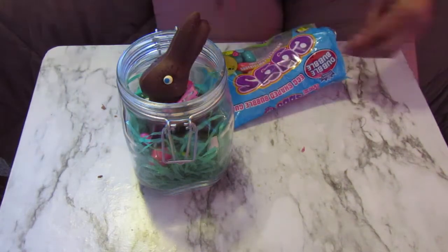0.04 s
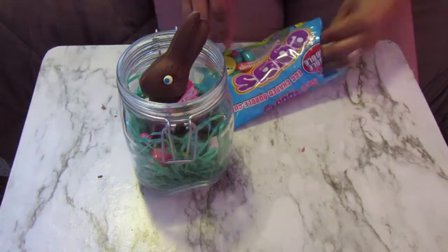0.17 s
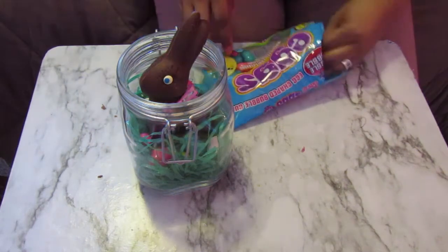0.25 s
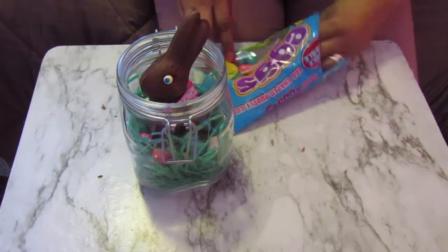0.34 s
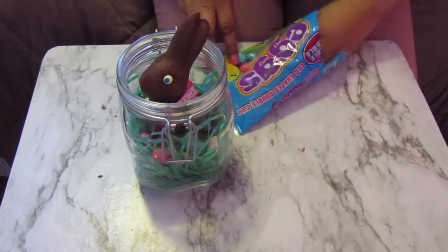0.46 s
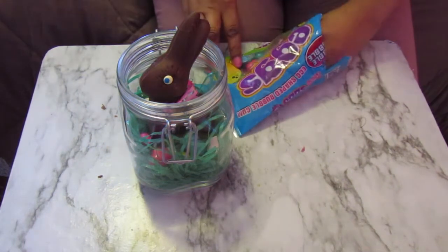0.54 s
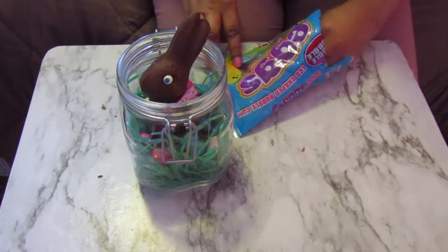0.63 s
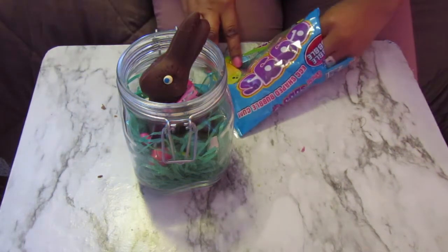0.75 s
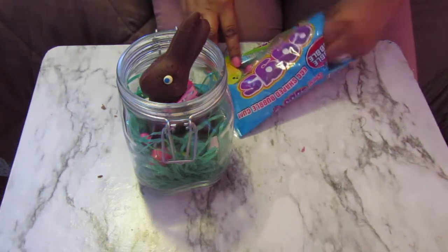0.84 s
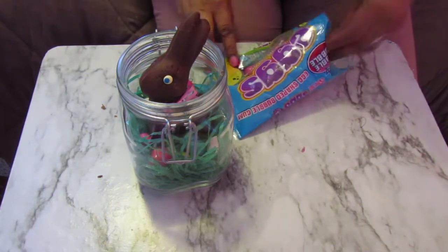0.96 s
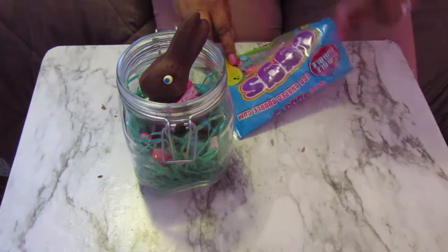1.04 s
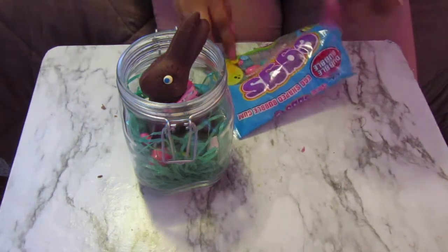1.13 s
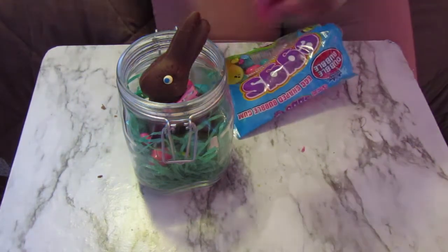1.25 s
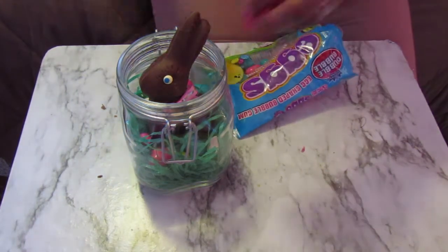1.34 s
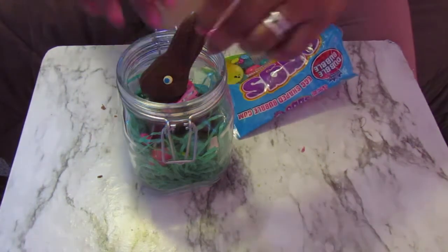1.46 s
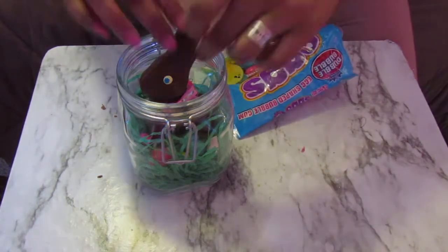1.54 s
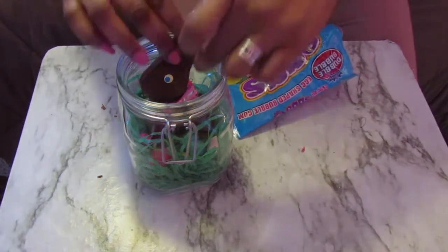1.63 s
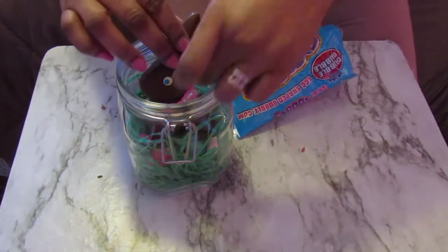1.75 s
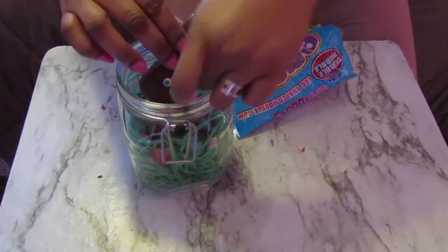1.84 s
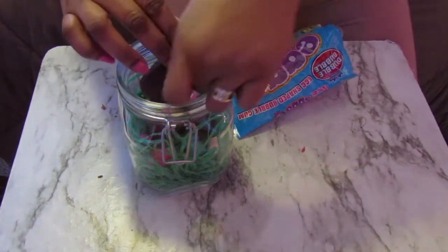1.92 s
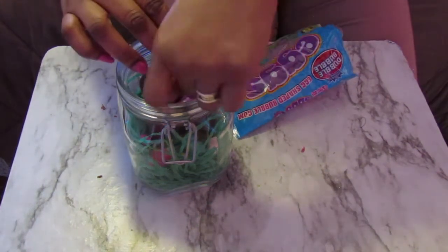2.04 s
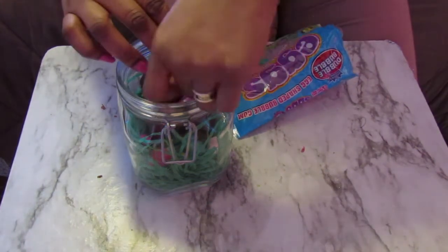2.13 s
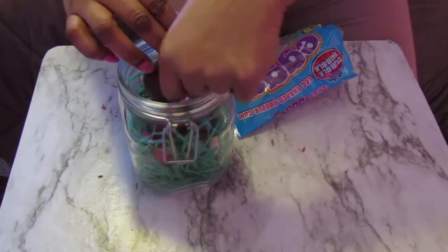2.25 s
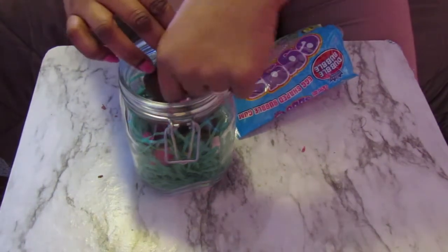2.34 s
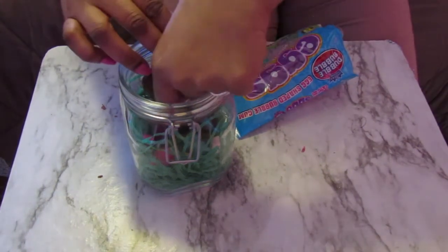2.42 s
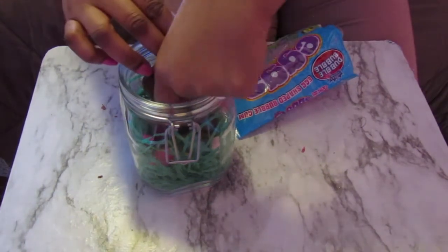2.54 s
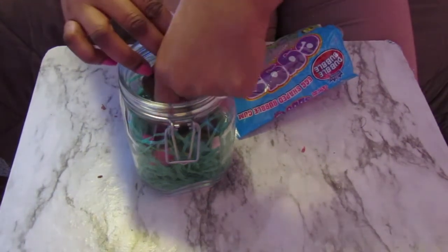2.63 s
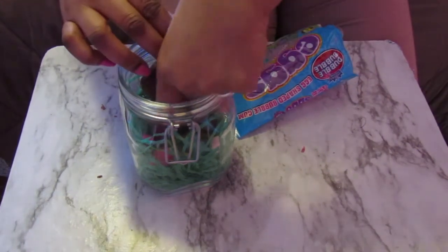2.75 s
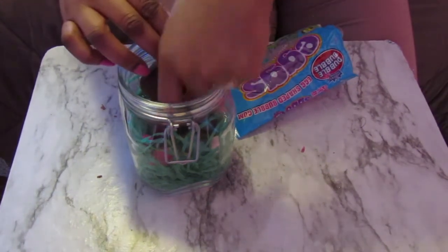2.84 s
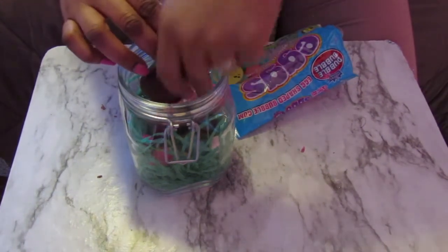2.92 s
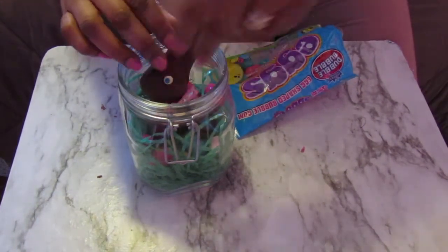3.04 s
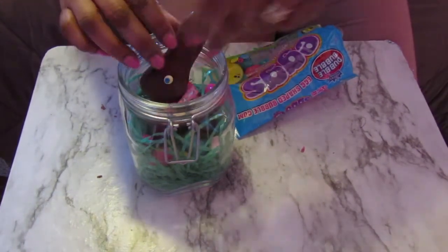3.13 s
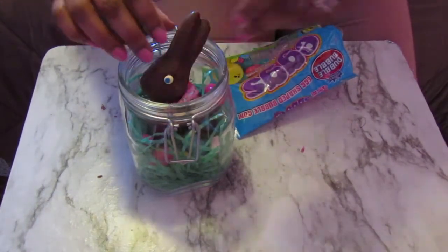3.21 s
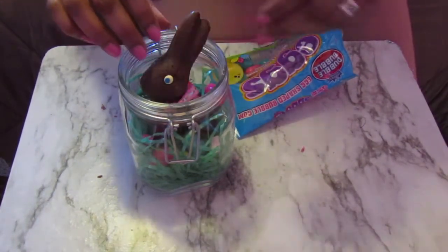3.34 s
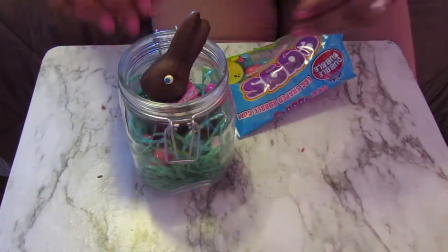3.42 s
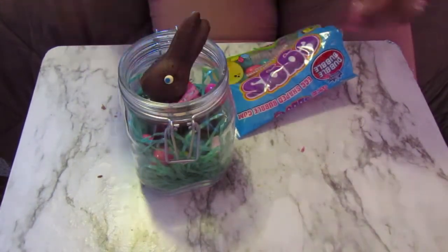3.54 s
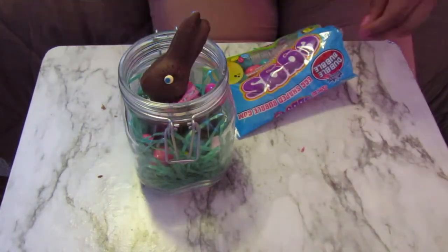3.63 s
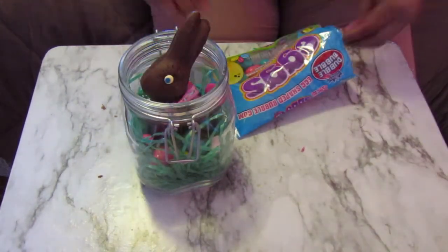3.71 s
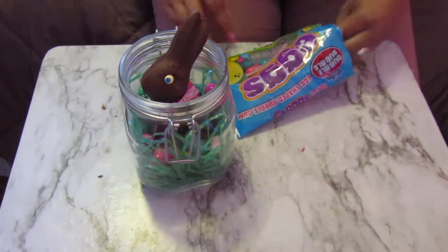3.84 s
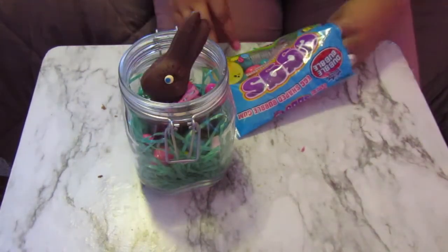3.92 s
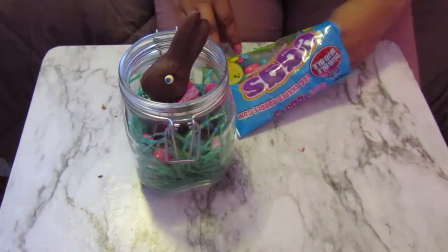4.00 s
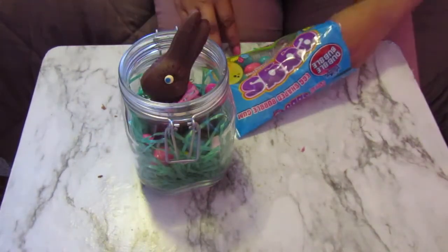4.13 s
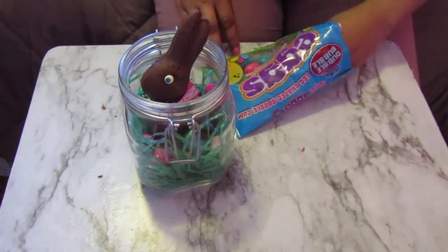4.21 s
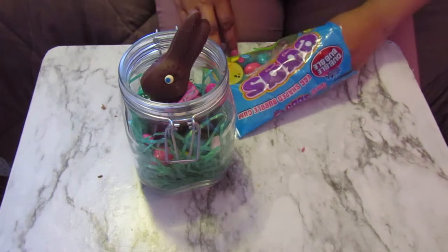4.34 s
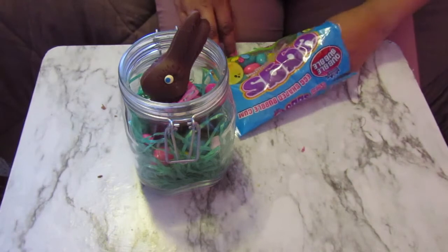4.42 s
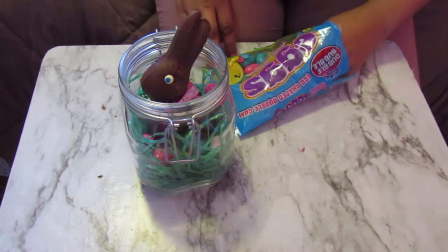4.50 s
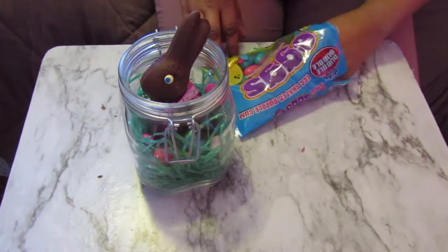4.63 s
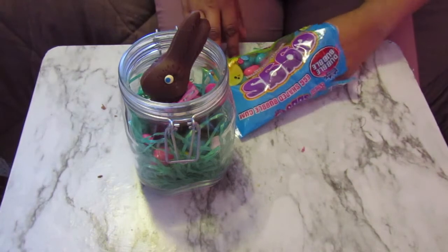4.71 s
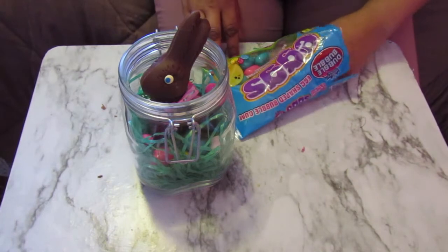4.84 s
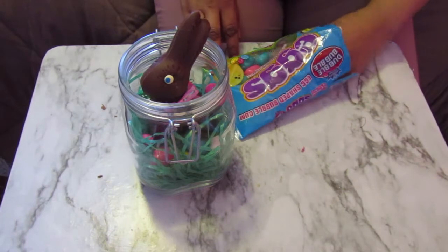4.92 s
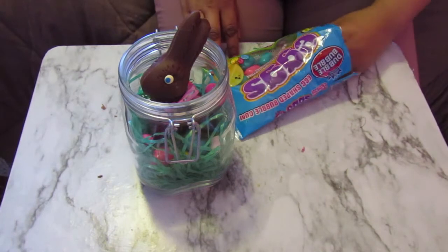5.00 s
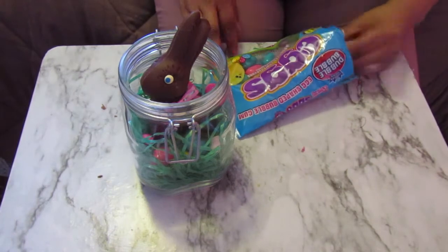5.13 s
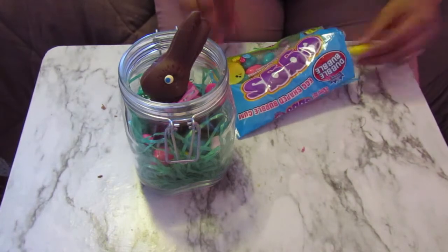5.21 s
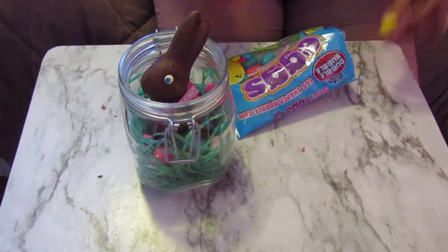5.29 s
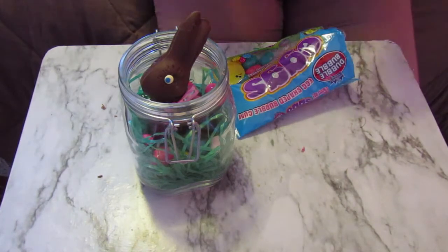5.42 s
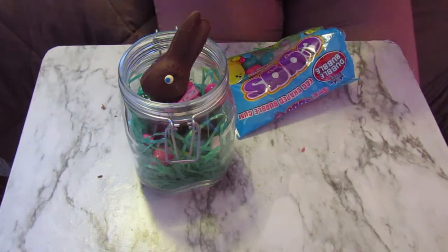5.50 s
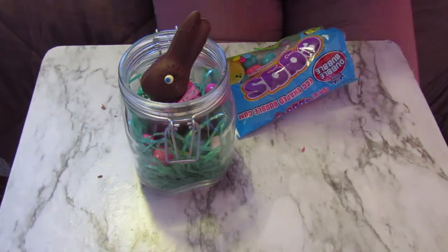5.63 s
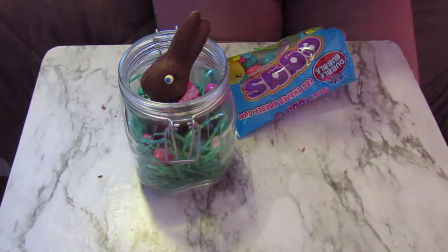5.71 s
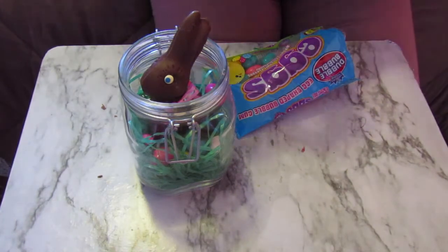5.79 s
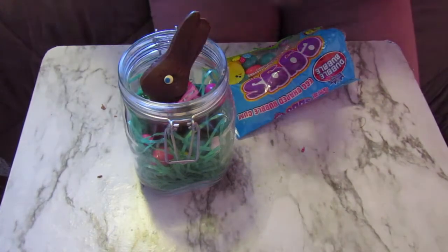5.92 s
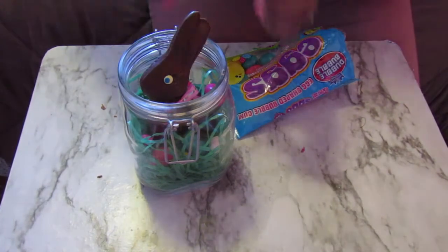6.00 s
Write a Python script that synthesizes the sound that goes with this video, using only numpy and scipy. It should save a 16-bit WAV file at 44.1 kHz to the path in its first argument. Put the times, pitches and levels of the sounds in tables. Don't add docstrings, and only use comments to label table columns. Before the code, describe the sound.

In a small soft-furnished room, a hand digs through stiff candy wrapping on a thin table: sharp pops over fine crackle. Hard gum eggs then tap a glass jar, first lightly in a double tick, then loudly and ringing. A lone film snap and table knock precede a second burst of rummaging. Faint appliance hum, hiss and tiny paired mechanical ticks lie behind.

```python
import sys
import numpy as np
from scipy import signal
from scipy.fft import rfft, irfft
from scipy.io import wavfile

SR = 44100
rng = np.random.default_rng(int(sys.argv[2]) if len(sys.argv) > 2 else 0)


def amplitude_ratio(level_db):
    exponent = np.asarray(level_db, float) / 20
    return 10 ** exponent


def materialize(psi):
    bounded = np.clip(np.atleast_2d(psi).T, -1, 1)
    quanta = np.round(bounded * 32767).astype(np.int16)
    wavfile.write(sys.argv[1], SR, quanta)


N = 267246

# low_hz, high_hz
FILM_BANDS = [(330, 1980), (1200, 4540), (4000, 9760)]


def rms_one(x):
    return x / np.sqrt(np.mean(x ** 2) + 1e-20)


def at_hz(points, hz):
    points_hz, values = np.transpose(points)
    return np.interp(np.log(hz), np.log(points_hz), values)


def curve_db(points):
    return np.interp(np.arange(N) / SR, *np.transpose(points), left=-120, right=-120)


def band(x, low_hz, high_hz):
    return signal.sosfilt(signal.butter(2, [low_hz, high_hz], "band", fs=SR, output="sos"), x + 1e-18)


def resonate(x, hz, width_hz):
    r = np.exp(-np.pi * width_hz / SR)
    w = 2 * np.pi * hz / SR
    return signal.lfilter([(1 - r * r) / 2, 0, (r * r - 1) / 2], [1, -2 * r * np.cos(w), r * r], x)


def ring(clicks, hz, t60):
    r = amplitude_ratio(-60 / (t60 * SR))
    w = 2 * np.pi * hz / SR
    return signal.lfilter([0, np.sin(w)], [1, -2 * r * np.cos(w), r * r], clicks + 1e-18)


def drift(rate_hz):
    steps = rng.standard_normal(600)
    return np.interp(np.arange(N) / SR * rate_hz, np.arange(600), steps)


def on_table(x, mix_db):
    # pitch_hz, width_hz, level_db
    modes = [(330, 40, -6), (630, 50, -1), (790, 40, 0), (880, 60, -1), (1550, 200, -6)]
    out = x
    for k, (hz, width_hz, db) in enumerate(modes):
        out = out + (-1) ** k * amplitude_ratio(db + mix_db) * resonate(x, hz, width_hz)
    return out


def snaps():
    # start_s, peak_db, crispness_db,
    # weight_on_table_db, ring_hz
    snaps_and_knocks = [(0.047, -12.5, -23.5, -17, 1730), (0.097, -13, -15.5, -10, 794),
                        (0.145, -12.5, -26, -6.5, 1750), (0.187, -3.5, -19.5, -11.5, 900),
                        (0.217, -7, -9.5, -21, 4150), (0.224, -13.5, -19, -9, 570), (0.249, -3.5, -18, -14, 846),
                        (0.286, -9.5, -14.5, -19, 1470), (0.295, -9, -20.5, -25, 2400), (0.333, -12, -23, -17, 604),
                        (0.343, -10, -16, -20, 910), (0.36, -11.5, -12, -19, 630), (0.379, -19, -29, -0.5, 630),
                        (0.388, -6.5, -8, -14, 850), (0.405, -2, -15.5, -35, 3720), (0.44, -2, -13.5, -27, 3890),
                        (0.469, -12, -14, -9.5, 693), (0.492, -9.5, -21, -17, 1440),
                        (0.511, -13.5, -25, -6.5, 1420), (0.569, -41, -7, -18, 1310),
                        (0.595, -19.5, -25, -18, 794), (0.61, -15, -11, -26, 1530),
                (0.649, -10.5, -16.5, -29, 4400), (0.676, -17, -19, -17.5, 1450),
                (0.709, -17.5, -14.5, -23, 1720), (0.756, -13, -10.5, -17, 1770),
                (0.82, -8, -14, -21, 1610), (0.84, -10, -13, -13, 2370), (0.891, -24, -23, -11, 890),
                (0.906, -22.5, -23, -19, 630), (0.961, -27, -18, -5, 550), (0.985, -12.5, -18.5, -10, 526),
                (1.003, -12.5, -17.5, -28, 1350), (1.04, -16, -5.5, -9.5, 1420),
                (1.074, -16.5, -26, -11, 1360), (1.099, -16.5, -12, -7.5, 750),
                (1.113, -11.5, -17, -17.5, 1480), (1.191, -9, -9.5, -14, 3800),
                (1.231, -19.5, -14, -7, 860), (1.379, -38.5, -39, -7.5, 1360),
                (1.433, -20.5, -33, -18, 1590),
                        (1.759, -10, -43, -62, 1610),
        (2.4809, -13, -26, -20, 3000),
        (2.798, -34, -30.5, -33, 4000),
        (2.838, -51, -6, -31, 7000),
        (2.928, -20.5, -28, -17.5, 2960),
        (3.364, -7.5, -16, -14.5, 4000),
        (3.366, -11, -17, -13, 1036),
                        (3.778, -28, -31, -7.5, 1120), (3.862, -29, -10, -12, 5300),
                   (3.912, -6.5, -41, -12.5, 830), (3.924, -7, -22.5, -11.5, 850),
                   (3.977, -16, -14.5, -16, 860), (4.034, -41, -15, -25, 5000),
                   (4.062, -35, -11, -22, 5000), (4.075, -23.5, -11, -12, 880), (4.102, -9, -22, -10, 1025),
                   (4.112, -7.5, -11, -15, 1750), (4.171, -7, -11, -15.5, 2530),
                   (4.229, -13.5, -26, -26, 2280), (4.245, -23, -2, -4, 523), (4.299, -16, -32, -21, 2320),
                   (4.3451, -13.5, -26, -20, 3400), (4.363, -1, -20, -21, 2630),
                   (4.412, -15.5, -11, -25, 5600), (4.42, -19, -8, -16, 850),
                   (4.451, -13.5, -14, -12.5, 1650), (4.461, -18, -31, -12, 1200),
                   (4.488, -2, -22.5, -26, 2450), (4.516, -11, -19, -13.5, 840),
                   (4.546, -2.5, -15, -25, 6830), (4.585, -26, -20, -19, 890),
                        (4.622, -8.5, -17, -15.5, 4000), (4.676, -17.5, -16.5, -16, 880),
                  (4.703, -19, -36, -23, 746), (4.727, -20.5, -33, -19, 680), (4.751, -25, -13, -7, 650),
                  (4.77, -22, -21, -15, 1500), (4.806, -23.5, -19, -16, 1390), (4.818, -28, -13.5, -8, 795),
                  (4.894, -11, -31, -29, 4170), (4.942, -14, -13.5, -18, 2540),
                  (5.043, -12.5, -19.5, -18.5, 2280), (5.075, -2.5, -24, -27.5, 3370),
                  (5.122, -6, -35, -34, 3780), (5.126, -12, -7.5, -15.5, 930),
                  (5.135, -9.5, -19, -15, 1260), (5.14, -5, -21.5, -15, 1800),
                  (5.15, -11.5, -9.5, -16, 780), (5.158, -15.5, -16, -10.5, 1840)]
    rows = np.array(snaps_and_knocks)

    # level under the peak, then dB gained per dB of crispness and of weight, fall time (s)
    level_db, per_crisp, per_weight = (-10, -5, -6), (-.1, 0.1, 1.26), (0.99, 0.26, -0.13)
    fall_s = (.004, .0015, .0008)
    usual_db = -16
    facet_db, facet_cycles, facet_rise_s = -4, 2.08, .00035
    places, length = 4, 1024

    t = np.arange(length) / SR
    out = np.zeros((places, N + length))
    shapes = rng.standard_normal((len(rows), len(FILM_BANDS), length))
    shapes = shapes * rng.exponential(1, (len(rows), 1, length))
    for k, (start_s, peak_db, crisp_db, weight_db, ring_hz) in enumerate(rows):
        burst = 0
        for b, (low_hz, high_hz) in enumerate(FILM_BANDS):
            part = band(shapes[k, b] * t * np.exp(-2 * t / fall_s[b]), low_hz, high_hz)
            crisp = per_crisp[b] * (crisp_db - usual_db)
            weight = per_weight[b] * (weight_db - usual_db)
            burst = burst + amplitude_ratio(level_db[b] + crisp + weight) * part / np.abs(part).max()
        facet = np.sin(2 * np.pi * ring_hz * t) * np.exp(-t * ring_hz / facet_cycles)
        facet = facet * (1 - np.exp(-t / facet_rise_s))
        at = int((start_s + .0008) * SR)
        out[k % places, at:at + length] += amplitude_ratio(peak_db) * (burst + amplitude_ratio(facet_db) * facet)
    return on_table(out[:, :N], mix_db=-10)


def crinkle():
    # time_s, level_db
    efforts = [
        [(0.03, -45.5), (0.14, -37), (0.31, -29), (0.366, -26), (0.528, -38), (0.718, -43), (1.046, -41),
         (1.236, -49), (1.45, -60)],
        [(3.89, -46.5), (3.95, -36), (4.082, -41.5), (4.362, -41), (4.574, -39.5), (4.838, -46), (5.084, -42.5),
         (5.208, -45), (5.27, -51.5)],
    ]
    mean_db = -38
    # cracks per s, level in dB, dB per dB of effort
    per_s, level_db, follows = (500, 900, 1500), (-6.5, -6, -11), (1, 1.11, 1.03)

    out = np.zeros(N)
    effort_db = np.maximum(*[curve_db(c) for c in efforts]) - mean_db
    for b, (low_hz, high_hz) in enumerate(FILM_BANDS):
        sizes = amplitude_ratio(3.6 * np.minimum(rng.exponential(1, N), 5)) * rng.choice([-1, 1], N)
        chance = per_s[b] * amplitude_ratio(7 * drift(30)) / SR
        cracks = band(sizes * (rng.random(N) < chance), low_hz, high_hz)
        out += amplitude_ratio(mean_db + level_db[b] + follows[b] * effort_db) * rms_one(cracks)
    return on_table(out, mix_db=8.5)


def slide():
    # time_s, level_db
    drag = [
        (3.765, -62),
        (3.78, -40),
        (3.82, -44),
        (3.84, -34.5),
        (3.9, -67),
    ]
    friction = rng.standard_normal(N) * amplitude_ratio(4.8 * drift(60))
    hiss = rms_one(resonate(friction, 4500, 800) + amplitude_ratio(-7.5) * resonate(friction, 7500, 1200))
    return hiss * amplitude_ratio(curve_db(drag) - 5.5)


def glass(hits, modes, level_db, split_hz, crack_db, clang_db):
    start_s, peak_db = np.transpose(hits)
    first = int(start_s[0] * SR)
    at = (start_s * SR).astype(int) - first
    sound, clicks = np.zeros(SR), np.zeros(SR)
    # detune in splits, share in dB, factor on t60
    cluster = ((-1.2, -8.5, 1.4), (1.1, 10.5, 0.6), (-3.0, 2, 0.32), (5.5, 8.0, 0.19))
    for hz, db, t60 in modes:
        flutter = amplitude_ratio(4.5 * drift(90)[:SR])
        for detune, share_db, damping in cluster:
            strike_db = peak_db + db + share_db + level_db + rng.normal(0, 1, len(at))
            clicks[at] = amplitude_ratio(strike_db) * rng.choice([-1, 1])
            shift_hz = detune * split_hz * np.sqrt(hz / 3000) * rng.uniform(0.59, 0.95)
            sound += flutter * ring(clicks, hz + shift_hz, t60 * damping)

    clicks[at] = amplitude_ratio(1.7 * peak_db)
    sound += amplitude_ratio(crack_db) * ring(band(clicks, 2100, 5200), 3937, 0.022)

    white = rng.standard_normal(SR)
    for db, t60 in ((clang_db, .11), (clang_db + 18.0, .012)):
        fall = signal.lfilter([1], [1, -amplitude_ratio(-60 / (t60 * SR))], clicks)
        sound += amplitude_ratio(db) * band(white * fall, 1700, 6400)
    return np.pad(band(sound, 1100, 21000), (first, N - SR - first))


def jar():
    # start_s, peak_db
    rim_hits = [
        (1.8322, -19.5),
        (1.8345, -16.5),
    ]
    wall_hits = [
        (2.4495, -20),
        (2.4878, -7),
        (2.497, -25),
        (2.5097, -24),
    ]
    # pitch_hz, level_db, t60_s
    rim_modes = [(1860, -8, 0.25), (3140, -31, 0.27), (3890, -12.5, 0.33), (4226, -23, 0.16),
                 (4850, -30, 0.29), (5440, -8.5, 0.24), (5880, -22, 0.26), (5970, -22, 0.29),
                 (6930, -18, 0.16), (7330, -31, 0.21), (7800, -21.5, 0.17), (9660, -33, 0.17)]
    wall_modes = [(1866, -10, 0.39), (2832, -26, 0.11), (3440, -19, 0.18), (3720, -1, 0.1),
                  (3860, -5, 0.52), (4770, -1, 0.26), (5540, -12, 0.17), (6100, -13, 0.34),
                  (6920, -3.5, 0.39), (7200, -10, 0.206), (7680, 1, 0.2), (8630, -24, 0.1),
                  (9900, -17, .17), (10100, -19, 0.24)]
    rim = glass(rim_hits, rim_modes, level_db=-13.5, split_hz=18.7, crack_db=12.5, clang_db=-17)
    wall = glass(wall_hits, wall_modes, level_db=-21.5, split_hz=45.5, crack_db=8.5, clang_db=-14.0)
    return rim + wall


def bumps():
    # start_s, peak_db, pitch_hz
    jar_bumps = [
        (1.662, -38, 189),
        (2.079, -44, 202),
        (2.213, -35, 199),
        (2.315, -26, 194),
        (2.347, -34, 172),
        (2.434, -36.5, 405),
        (2.547, -38.5, 630),
    ]
    # start_s, peak_db, pitch_hz
    thumps = [
        (.26, -35, 70),
        (0.991, -31, 163),
        (3.365, -35, 181),
        (3.779, -33.5, 333),
        (4.248, -28, 333),
        (5.134, -30.5, 167),
    ]
    length = 4096
    out, t = np.zeros(N), np.arange(length) / SR
    for start_s, db, hz in jar_bumps + thumps:
        push = rng.standard_normal(length) * np.sqrt(t) * np.exp(-t / 0.00794)
        noise = resonate(push, hz, hz / 2) + amplitude_ratio(-14.5) * band(push, 273, 680)
        at = int(start_s * SR)
        out[at:at + length] += amplitude_ratio(db) * noise / np.abs(noise).max()
    return signal.sosfilt(signal.butter(4, 1000, fs=SR, output="sos"), out)


def drive_ticks():
    pairs, from_s, every_s, pair_s = 19, 1.519, .12, .02
    tick_s = from_s + every_s * np.arange(pairs)[:, None] + [0, pair_s]
    ticks = np.zeros(N)
    at = ((tick_s + rng.normal(0, .002, tick_s.shape)) * SR).astype(int)
    ticks[at] = amplitude_ratio(-48.5 + rng.normal(0, 2.5, tick_s.shape))
    return ring(ticks, 2900, .011) + amplitude_ratio(-6) * ring(ticks, 1910, 0.038)


def room(x):
    # pitch_hz, t60_s
    decay = [(200, 0.23), (600, 0.18), (1500, 0.15), (4000, 0.2), (10000, 0.19)]
    t = np.arange(int(SR / 2)) / SR
    edges_hz = 180 * 2 ** np.arange(7)
    tail = 0
    for low_hz, high_hz in zip(edges_hz, edges_hz[1:]):
        t60 = at_hz(decay, np.sqrt(low_hz * high_hz))
        tail = tail + band(rng.standard_normal(len(t)), low_hz, high_hz) * amplitude_ratio(-60 * t / t60)
    tail = tail * np.clip((t - .002) / 0.00051, 0, 1)
    tail = tail + amplitude_ratio(-5.5) * signal.sosfilt(signal.butter(1, 3000, fs=SR, output="sos"), tail)
    return signal.fftconvolve(x, tail / np.sqrt(np.sum(tail ** 2)))[:N]


def background():
    # pitch_hz, level_db (per Hz)
    floor = [(12, -39), (20, -7), (200, -7.5), (1000, -11), (2110, -18.5), (6000, -22.5), (12000, -29),
             (22000, -46.5)]
    # pitch_hz, width_hz, level_db
    tones = [(404.6, 6.5, -2.5), (824, 30, -9.5), (1144, 36, -4.5), (1364, 68, -11), (1949, 45, -9.5),
             (3630, 50, -18.5)]
    hz = np.fft.rfftfreq(N, 1 / SR) + 1
    air = rms_one(irfft(rfft(rng.standard_normal(N)) * amplitude_ratio(at_hz(floor, hz)), N))
    white = rng.standard_normal(N)
    hum = 0
    for tone_hz, width_hz, db in tones:
        hum = hum + amplitude_ratio(db) * rms_one(resonate(resonate(white, tone_hz, width_hz), tone_hz, width_hz))

    duck_s = 2.49 + np.cumsum([0, 0.077, 0.67, 0.21])
    duck_db = -4 * np.interp(np.arange(N) / SR, duck_s, [0, 1, 1, 0])
    return amplitude_ratio(-53.5 + duck_db) * (air + amplitude_ratio(-4.5) * hum)


def scene():
    clinks = jar()
    bag = sum(x + amplitude_ratio(-6.5) * room(x) for x in [*snaps(), crinkle() + slide()])
    bag = signal.sosfilt(signal.butter(2, 150, "high", fs=SR, output="sos"), bag)
    hands = bumps() + drive_ticks()
    near = bag + hands + clinks
    tails = amplitude_ratio(-12) * room(hands) + amplitude_ratio(-9) * room(clinks)
    return (near + tails + background())[None]


def band_limit(x):
    return signal.sosfilt(signal.butter(12, 12870, fs=SR, output="sos"), x)


def record(dry):
    clipped = np.clip(dry, -1, 1)
    mix = signal.sosfilt(signal.ellip(8, .5, 42, 11850, fs=SR, output="sos"), clipped)
    return band_limit(mix)


dry = scene()
out = record(dry)
materialize(out)
```